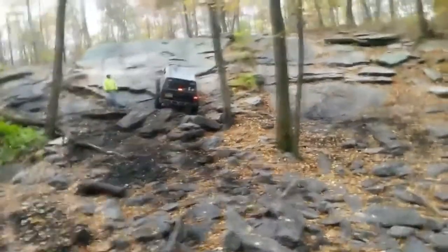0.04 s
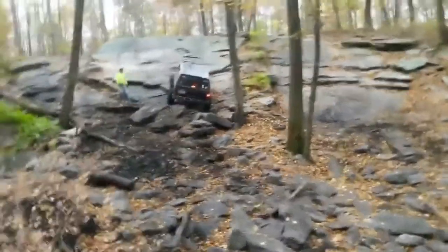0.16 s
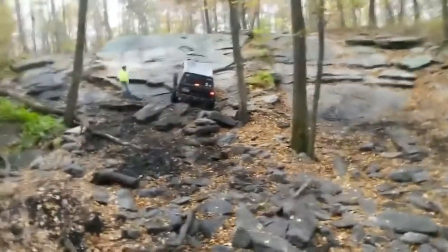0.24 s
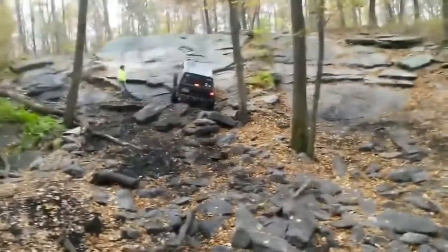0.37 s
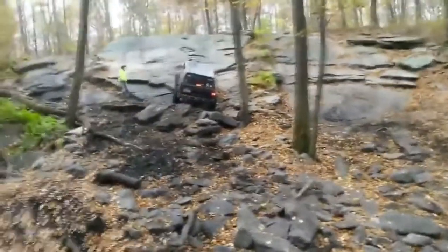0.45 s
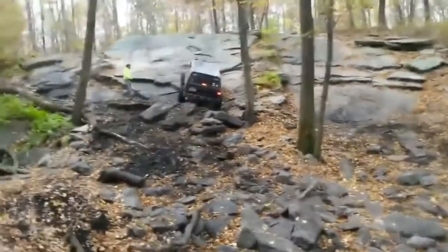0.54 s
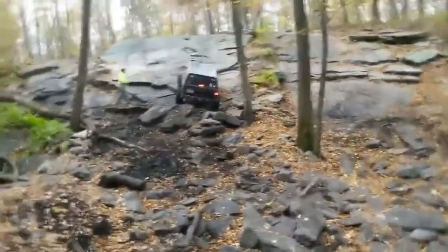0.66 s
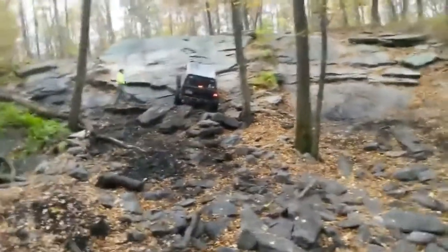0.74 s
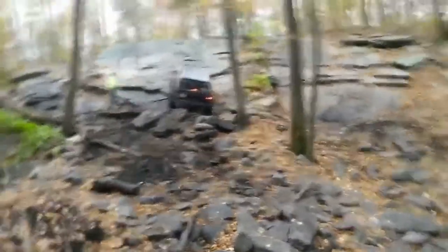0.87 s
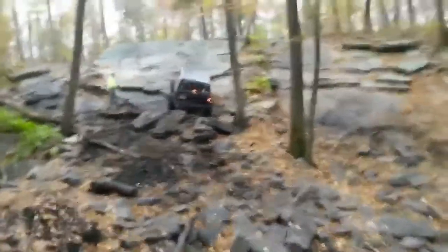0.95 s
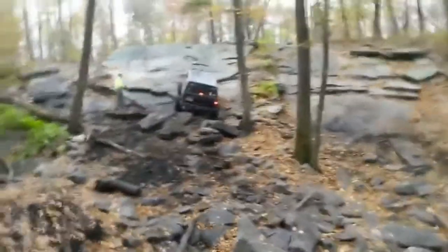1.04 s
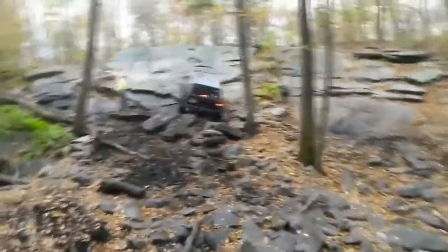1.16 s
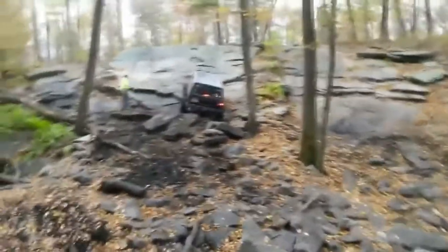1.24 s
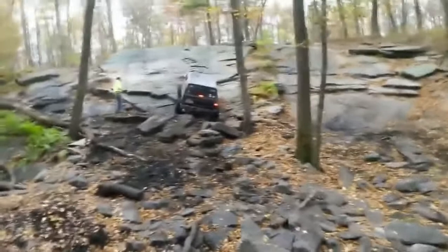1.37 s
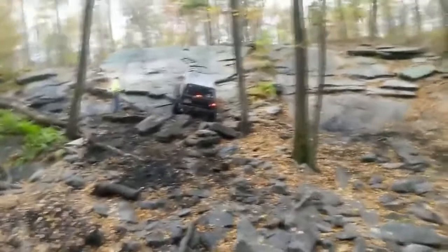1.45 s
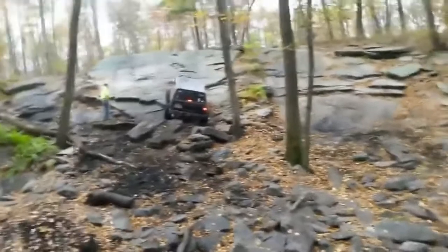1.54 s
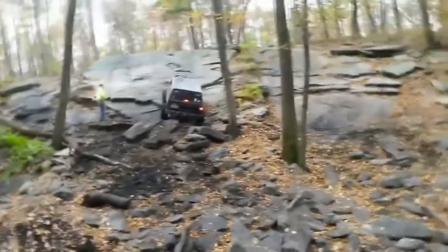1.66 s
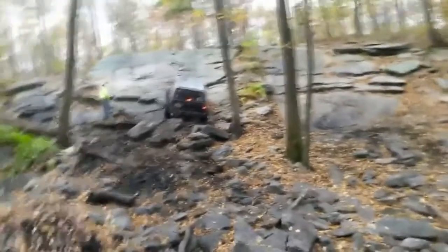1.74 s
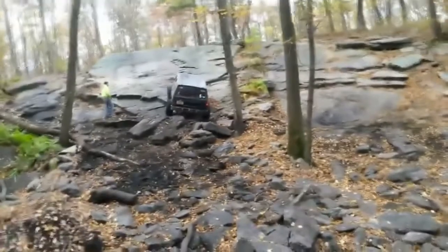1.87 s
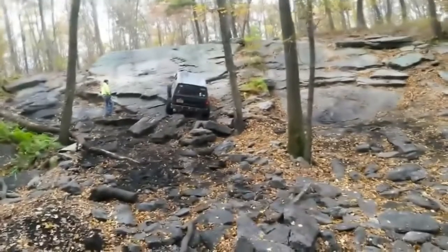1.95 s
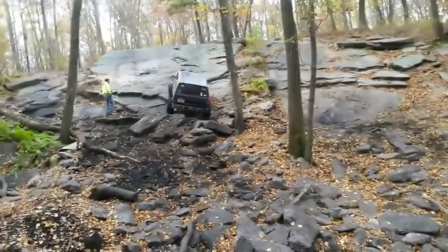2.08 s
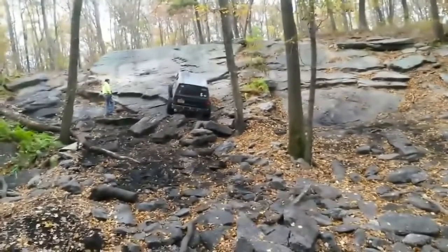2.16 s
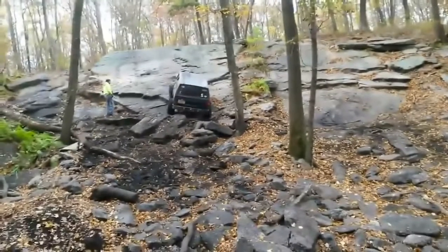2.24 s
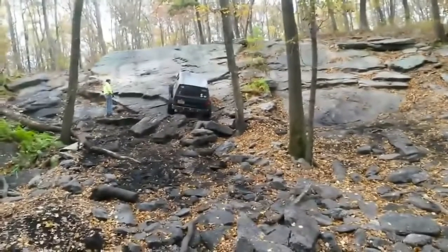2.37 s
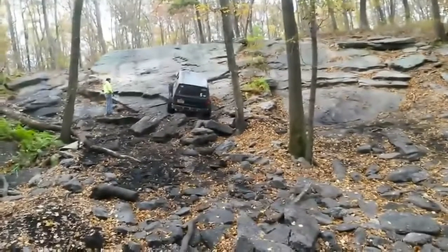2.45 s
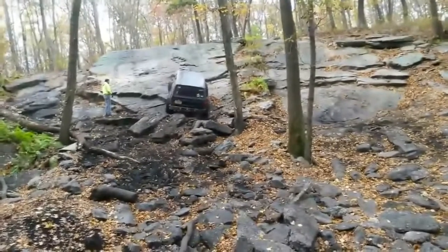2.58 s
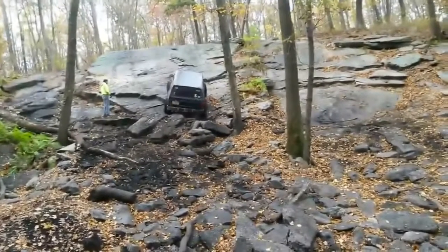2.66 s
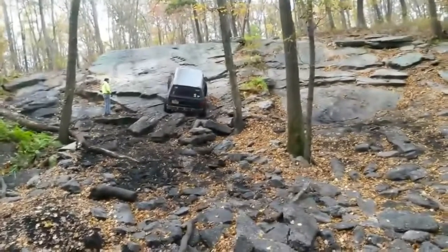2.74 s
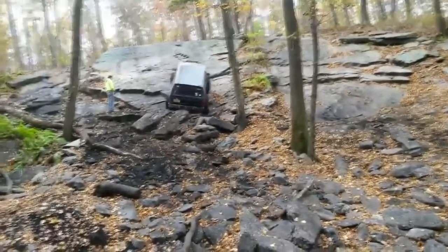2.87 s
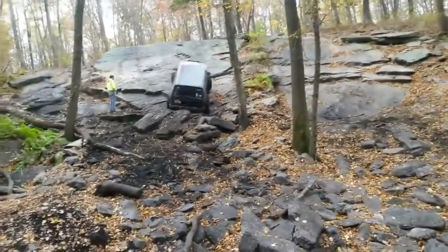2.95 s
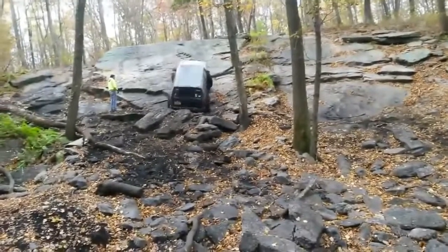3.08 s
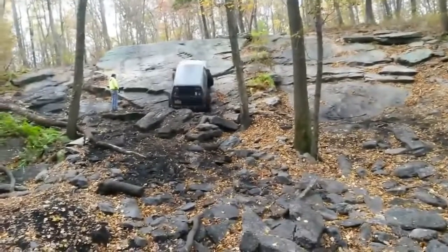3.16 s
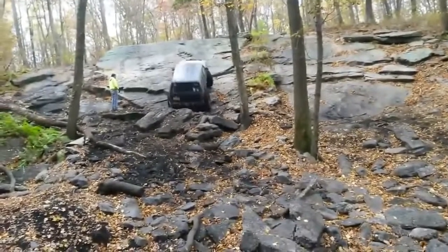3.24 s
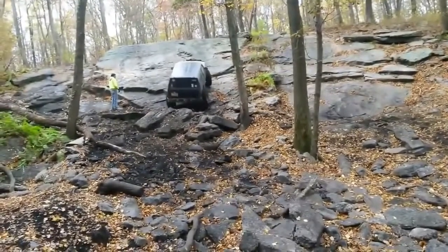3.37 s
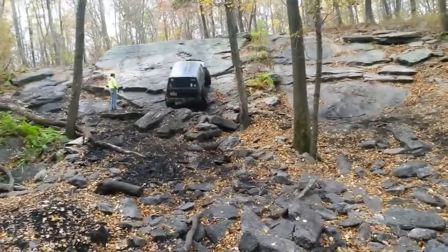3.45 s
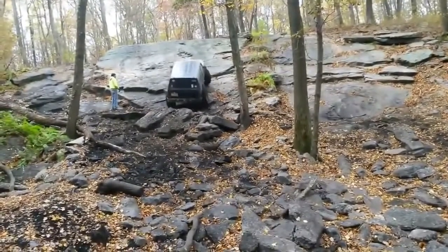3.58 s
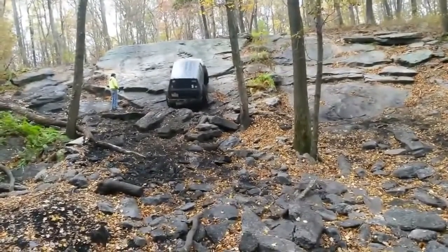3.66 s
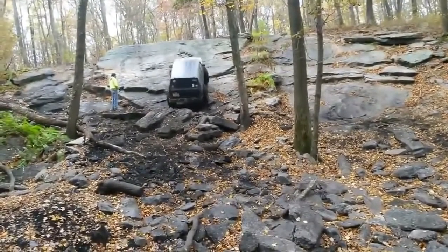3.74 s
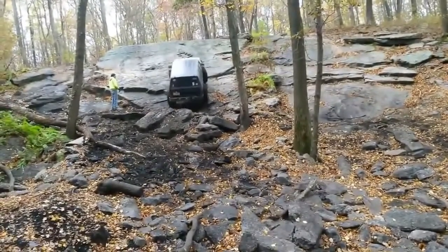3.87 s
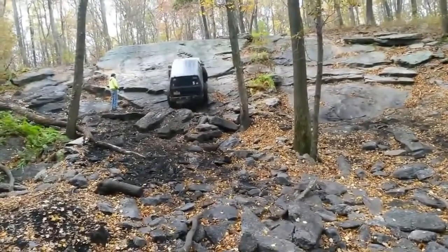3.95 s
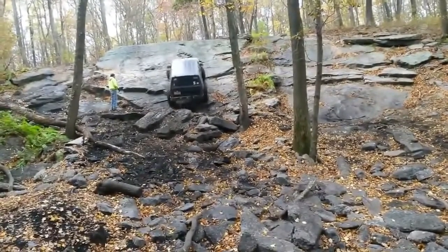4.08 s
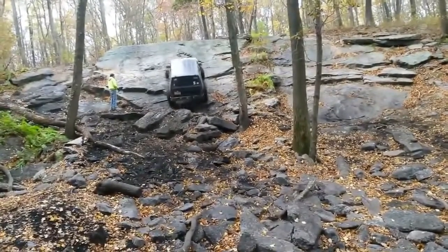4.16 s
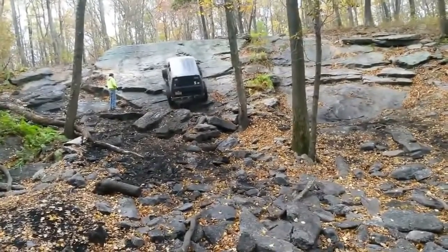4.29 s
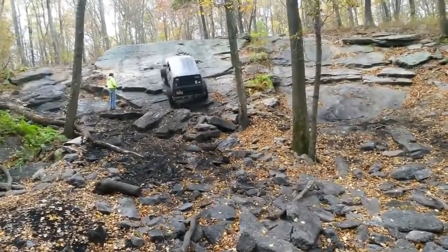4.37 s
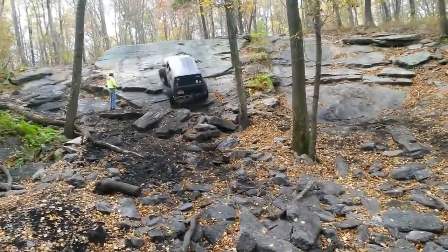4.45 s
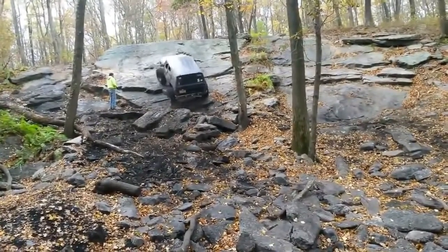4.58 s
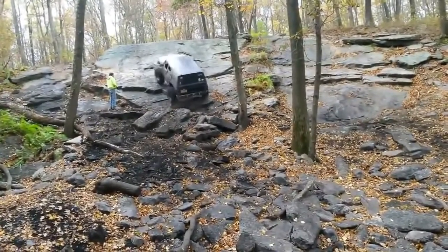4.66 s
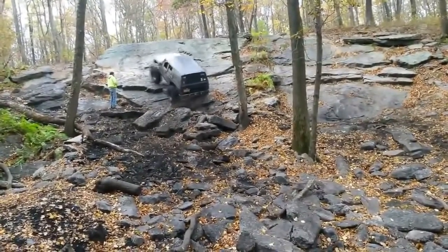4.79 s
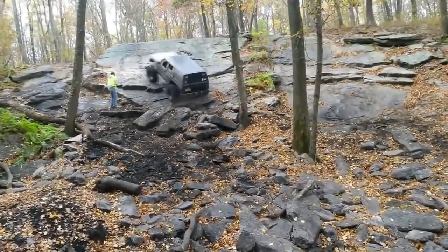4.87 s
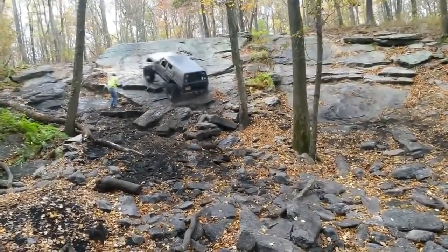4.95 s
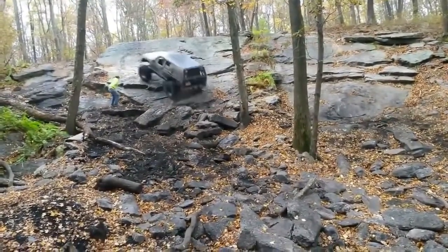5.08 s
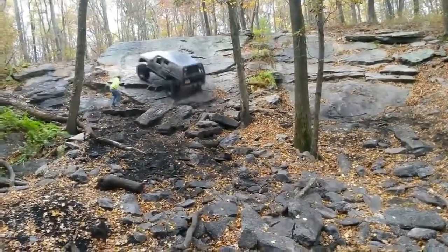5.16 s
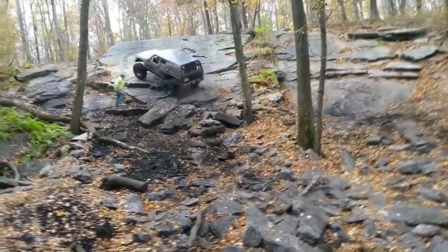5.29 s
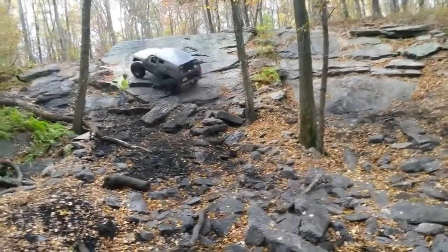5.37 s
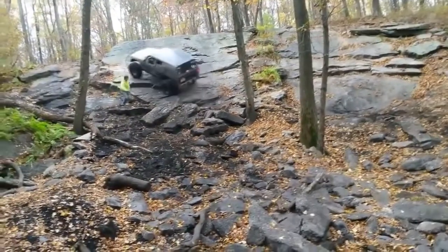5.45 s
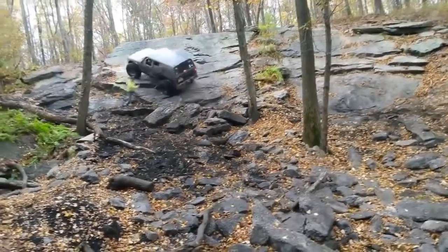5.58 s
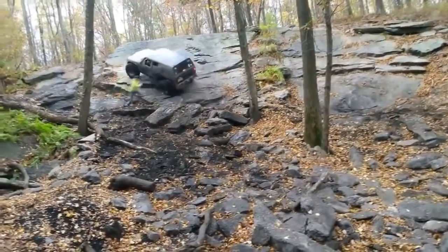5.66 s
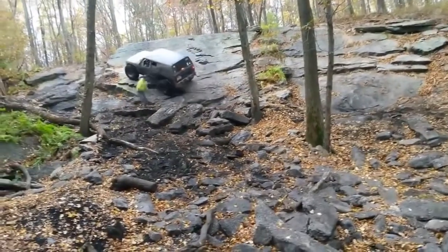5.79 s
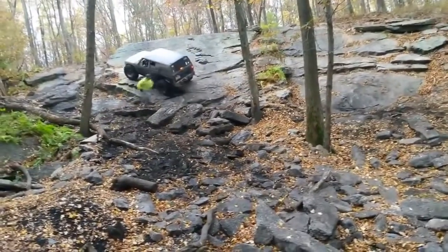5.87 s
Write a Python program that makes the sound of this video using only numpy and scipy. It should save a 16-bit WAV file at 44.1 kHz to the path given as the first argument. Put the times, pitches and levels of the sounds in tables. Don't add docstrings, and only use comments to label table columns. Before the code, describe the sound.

Outdoors, an engine idles, revs hard with a rushing hiss for about three seconds, then falls off with metal clanks; another engine rattles nearby.

```python
import sys
import numpy as np
from scipy import signal
from scipy.fft import rfft, irfft, next_fast_len
from scipy.io import wavfile
from scipy.ndimage import uniform_filter1d

SR = 44100
rng = np.random.default_rng(int(sys.argv[2]) if len(sys.argv) > 2 else 0)


def field_ratio(decibels):
    return 10 ** (np.asarray(decibels, dtype=float) / 20)


def master(y):
    cut = np.clip(np.atleast_2d(y).T, -1, 1)
    pcm = np.round(cut * 32767)
    wavfile.write(sys.argv[1], SR, pcm.astype(np.int16))


N = 261099
T = np.arange(N) / SR

FAST_HZ, SETTLED_HZ, LOAD_IN_S = 38.54, 35.68, .42
# pitch_hz, density [dB per Hz]
AIR_HISS = [(790, -33), (1350, -4.5), (1940, -1), (3080, -2), (4040, -6.5), (5550, -1), (7500, -8),
            (8050, -17), (9000, -19.5), (11700, -38), (19800, -120)]


def evened(x):
    return x / np.sqrt(np.mean(x ** 2) + 1e-20)


def read(points, hz):
    f, value = np.transpose(points)
    return np.interp(np.log(hz + 1), np.log(f + 1), value)


def columns(rows):
    s, *cols = np.transpose(rows)
    return [np.interp(T, s, c) for c in cols]


def bumps(rows):
    total = 0
    for s, half_s, *dbs in rows:
        total = total + np.array(dbs)[:, None] * np.exp(-.5 * ((T - s) / half_s) ** 2)
    return total


def colour(x, points):
    gain_db = np.maximum(read(points, abs(np.fft.fftfreq(8192, 1 / SR))), -90)
    log_gain = np.log(field_ratio(gain_db))
    phase = -signal.hilbert(log_gain).imag
    taps = np.fft.ifft(np.exp(log_gain + 1j * phase)).real[:4096]
    taps = taps.reshape((1,) * (x.ndim - 1) + (-1,))
    return signal.oaconvolve(x, taps, axes=-1)[..., :N]


def wander(rate_hz, count):
    knots = rng.standard_normal((count, 400))
    return np.array([np.interp(T * rate_hz, np.arange(400), k) for k in knots]) * 1.2


def level(x, width_s):
    return np.sqrt(abs(uniform_filter1d(x ** 2, int(width_s * SR))) + 1e-12)


def add(mix, s, sound):
    part = mix[round(s * SR):][:len(sound)]
    part += sound[:len(part)]


def ring(modes, factor, size):
    t = np.arange(size) / SR
    return sum(field_ratio(db - 60 * t / t60) * np.sin(2 * np.pi * hz * factor * t) for hz, db, t60 in modes)


def speed():
    # start_s, firing_hz
    rev_points = [(2.08, 36.84), (2.2, 45.25), (2.3, 62.8), (2.5, 95.2), (2.73, 119.2), (3.01, 147.2),
                  (3.16, 174.5), (3.35, 168), (3.56, 193.3), (3.88, 215.7), (4.1, 244.3), (4.4, 255),
                  (4.66, 257.8), (4.8, 236.7), (4.95, 220.6), (5.07, 196.7), (5.3, 159.5), (5.62, 72)]
    sag_hz, sag_s, recover_s, fall_s = 6.0, .12, .3, 0.11
    late = np.maximum(T - LOAD_IN_S, 0)
    idle = SETTLED_HZ + (FAST_HZ - SETTLED_HZ + sag_hz) * np.exp(-late / sag_s)
    idle -= sag_hz * np.exp(-late / recover_s)
    fall = np.exp(-np.maximum(T - rev_points[-1][0], 0) / fall_s)
    rev = FAST_HZ + (columns(rev_points)[0] - FAST_HZ) * fall
    return np.where(T < rev_points[0][0], idle, rev)


def tone_levels(hz, stumble_db, upper_db):
    # start_s, level_db
    pull = [(2.05, -25.5), (2.2, -9), (2.3, -5), (2.45, -10), (2.66, -5), (2.9, -8), (3.15, -12),
            (3.6, -9.5), (3.8, -7.5), (4.0, -15), (4.39, -3.5), (4.64, -14.5), (4.73, -3), (4.87, -11.5),
            (4.95, -5), (5.3, -9), (5.35, -19.5), (5.8, -27.5)]
    # pitch_hz, gain_db
    tuned_pipe = [(35, -19), (60, -6), (112, 0.5), (150, -4.5), (205, -2), (245, -11), (400, -11),
                  (800, -16)]
    # multiple of the firing rate, idle level_db, tilt [dB per doubling of speed]
    multiples = [(1, 0, 0), (2, -5.5, -1), (3, -6, -10)]
    pressure_db = columns(pull)[0] + stumble_db
    doublings = np.log2(hz / SETTLED_HZ)
    first, second, third = [pressure_db + read(tuned_pipe, k * hz) + db + tilt_db * doublings
                            for k, db, tilt_db in multiples]
    fast = np.clip((LOAD_IN_S + 0.058 - T) / 0.12, 0, 1) + np.clip((T - 5.84) / 0.048, 0, 1)
    return first, second + upper_db, third + upper_db + 12.5 * fast


def tones(turns, levels_db):
    total = 0
    for k, (db, w) in enumerate(zip(levels_db, wander(22.107, count=3))):
        total = total + np.sqrt(2) * field_ratio(db + 1.8 * w) * np.cos(2 * np.pi * (k + 1) * turns - 0.78 * k)
    return total


def cycle_lines(turns, hz, rasp_db):
    # multiple of the six-firing cycle, level_db
    weak_lines = [(1, -32), (2, 0.5), (3, -16.5), (4, -14), (5, -10.5), (6, 0), (7, -20), (8, -11),
                  (9, -15.5), (10, -10.5), (11, -37), (12, -9), (13, -22), (14, -22), (15, -18.5), (16, -7),
                  (17, -23), (18, -17), (19, -12), (20, -18), (21, -14.5), (22, -2), (23, -23.5),
                  (24, -18.5), (25, -20.5), (26, -25), (27, -15)]
    # multiple of the cycle, level_db at full speed, slope [dB per Hz below it]
    strong_lines = [(2, -24, .217), (4, -36, -.052), (8, -37, .099), (9, -37, .122), (10, -37, .043),
                    (14, -40, .07), (16, -27.5, .214), (18, -38, .101), (19, -37, .214), (20, -32, .186),
                    (22, -30.5, .19), (23, -39, .173), (25, -43, .165), (26, -42, .083), (28, -43, .106),
                    (30, -48, -.003)]
    # multiple of the cycle, centre_s, half_length_s, level_db
    swells = [(2, 4.4, 0.13, 4), (2, 5.24, 0.06, 11), (4, 3.34, 0.13, 4.5), (4, 3.74, 0.13, 8),
              (4, 5.14, 0.06, 8), (8, 3.7, 0.09, 8), (8, 4.14, 0.13, 7), (8, 5.28, 0.04, 15),
              (9, 2.92, 0.09, 19), (9, 4.28, 0.13, 10), (9, 4.8, 0.04, 8), (10, 3.24, 0.09, 11),
              (10, 3.94, 0.04, 14), (10, 4.54, 0.09, 9), (14, 3.32, 0.04, 10), (14, 4.12, 0.06, 16),
              (14, 4.86, 0.04, 11), (14, 5.14, 0.13, 13), (16, 3.34, 0.09, 9), (16, 4.22, 0.13, 7),
              (16, 4.76, 0.09, 7), (16, 5.22, 0.06, 12), (18, 2.9, 0.13, 12), (18, 3.92, 0.06, 16),
              (18, 4.8, 0.09, 11), (19, 4.38, 0.13, 11), (19, 5.22, 0.06, 16), (20, 2.92, 0.06, 17),
              (20, 4.12, 0.06, 15), (20, 4.8, 0.04, 16), (20, 5.12, 0.13, 8), (22, 4.12, 0.04, -10),
              (22, 4.58, 0.13, 8), (22, 4.88, 0.04, 6), (22, 5.22, 0.09, 12), (23, 4.16, 0.13, 9),
              (23, 4.9, 0.04, 16), (23, 5.24, 0.06, 18), (25, 4.46, 0.04, 14), (25, 4.8, 0.13, 7),
              (25, 5.24, 0.13, 9), (26, 3.86, 0.13, 10), (26, 4.98, 0.13, 12), (28, 3.76, 0.06, 11),
              (28, 4.32, 0.09, 9), (28, 5.1, 0.13, 11), (30, 3.28, 0.09, 10), (30, 3.88, 0.13, 7),
              (30, 5.2, 0.09, 15)]
    full_hz = 256
    elsewhere = (6, 12, *[row[0] for row in strong_lines])
    weak = 0
    for (k, db), w in zip(weak_lines, wander(7, count=len(weak_lines))):
        if k not in elsewhere:
            weak = weak + field_ratio(db + 5.2 * w) * np.cos(2 * np.pi * k * (turns / 6 + 0.016 * w))
    strong = 0
    for (k, db, slope), w in zip(strong_lines, wander(23.92, count=len(strong_lines))):
        swell_db = bumps([row[1:] for row in swells if row[0] == k])[0]
        line_db = db + slope * (hz - full_hz) + swell_db + 1.5 * w
        strong = strong + np.sqrt(2) * field_ratio(line_db) * np.cos(2 * np.pi * k * turns / 6 + k * k)
    loaded = np.interp(T, [2.6, 2.9, 5.25, 5.4], [0, 1, 1, 0])
    return field_ratio(rasp_db - 11.0) * evened(weak) + loaded * strong


def chuffs(turns, chuff_db):
    # pitch_hz, density [dB per Hz]
    pipe_body = [(15, -21), (25, -15), (59, -12.5), (140, 2.5), (163, -8.5), (220, -7.5), (255, -15),
                 (335, -10), (425, -22.5), (502, -16), (583, -30.5), (730, -25.5), (900, -45), (1170, -45),
                 (1980, -120)]
    fired = np.diff(np.floor(turns), prepend=0) > 0
    cylinder = np.array([0.88, 0.15, -1.3, -1.1, 0.98, -1.43])[turns.astype(int) % 6]
    push = fired * (0.73 * cylinder + np.clip(rng.standard_normal((2, N)), -2, 2))
    lump = colour(push + 0.066 * rng.standard_normal((2, N)), pipe_body)
    return field_ratio(chuff_db) * lump / level(lump, 0.23)


def cracks():
    # start_s, peak level_db
    snaps = [(2.131, -40), (2.154, -27.5), (2.178, -24.5), (2.201, -31), (2.221, -21.5), (2.241, -30),
             (2.261, -31), (2.279, -31), (2.296, -40), (2.308, -26.5), (2.337, -24), (2.353, -25),
             (2.366, -26), (2.383, -32), (2.405, -29), (2.43, -29), (2.466, -28), (2.498, -29),
             (2.537, -28)]
    # pitch_hz, level_db, t60_s
    tailpipe = [(810, 8, 0.043), (1150, -16, 0.018), (1940, -4, 0.03), (2226, -3, 0.051), (2690, -7, 0.069)]
    out = np.zeros(N)
    puffs = evened(colour(rng.standard_normal(N), [(300, -9), (800, 0), (2500, 8), (6000, -27)]))
    for s, db in snaps:
        add(out, s, field_ratio(db - 6.0) * ring(tailpipe, 1, size=2000))
        puff = puffs[round(s * SR):][:800] * field_ratio(-60 * T[:800] / 0.018)
        add(out, s, field_ratio(db - 3.0) * puff)
    return out


def puffed(turns, points, depth, patchy_db, grit):
    strength = field_ratio(2.0 * rng.standard_normal(2000))[turns.astype(int)]
    gate = 1 + depth * strength * np.exp(-(turns % 1) / 0.5)
    specks = depth * grit * np.minimum(rng.exponential(1, N), 3) * (rng.random(N) < 150 / SR)
    noise = colour(gate * rng.standard_normal((2, N)) + specks, points)
    return noise / level(noise, 0.063) * field_ratio(patchy_db * wander(30, count=1))


def follow(flow_db, idle_db, middle_db, slope):
    return 10 * np.log10(field_ratio(2 * idle_db) + field_ratio(2 * (middle_db + slope * (flow_db + 28))))


def rushing_air(turns, hz):
    # start_s, hiss level_db
    flow_points = [(2.12, -48), (2.17, -37), (2.42, -28), (2.65, -27), (2.77, -31), (2.98, -32.5),
                   (3.28, -29.5), (3.68, -26), (4.14, -20.5), (4.65, -20), (4.73, -21.5), (4.86, -20),
                   (5.0, -23), (5.16, -25), (5.26, -22.5), (5.49, -38.5), (5.92, -42.5)]
    # centre_s, half_length_s, rasp_db, hiss_db, fizz_db
    jolts = [
        (1.65, 0.087, 3, 1.5, 2),
        (2.23, 0.047, 11.5, -0.5, 4),
        (2.705, 0.028, -10, -6, -4),
        (3.36, 0.032, 1, 2.5, 9),
        (5.19, .03, 4.5, 0.5, 0),
        (5.61, 0.017, 10, 1, 1),
        (5.72, 0.031, 3, -4, -7),
        (5.8, 0.026, 7, 4, 0),
    ]
    # idle level_db, level_db at middle flow, slope [dB per dB of flow]
    rasp_law = (-42, -25.5, 1.4)
    fizz_law = (-54.5, -45, 1.3)
    # pitch_hz, density [dB per Hz]
    rasp = [(150, -29.5), (250, -4.5), (291, -7), (360, -5), (419, -5), (468, -5.5), (560, -7.5), (670, -6),
            (738, -13), (819, -6.5), (1300, -15.5), (1690, -62), (2860, -120)]
    fizz = [(4410, -39), (7500, 3.5), (8040, -1), (9670, -2), (12300, 1.5), (13300, -1.5), (14500, -22)]
    shield = [(500, -25), (830, 8.5), (1250, -21), (1900, -10), (2400, 0.5), (3200, -27)]
    whistle = [(4000, -30), (5000, -6), (6300, 0), (7500, -1), (7950, -30)]
    flow_db = columns(flow_points)[0]
    follow_db = [follow(flow_db, *rasp_law), flow_db, follow(flow_db, *fizz_law)]
    rasp_db, hiss_db, fizz_db = bumps(jolts) + follow_db
    load = np.clip((hiss_db + 55.5) / 14, .1, 1)
    sharp = load * (1 + 2.1 * np.clip((100 - hz) / 50, 0, 1))
    air = field_ratio(rasp_db - 5.5) * puffed(turns, rasp, sharp * 0.93, patchy_db=1.34, grit=0.95)
    air += field_ratio(hiss_db) * puffed(turns, AIR_HISS, sharp * 0.24, patchy_db=0.72, grit=4.7)
    air += field_ratio(fizz_db) * puffed(turns, fizz, load * 0.34, patchy_db=0.7, grit=6.0)
    buzz_db = hiss_db - 5.5 - np.clip(hz - 110, 0, 200) / 12
    air += load * field_ratio(buzz_db) * puffed(turns, shield, 1.3, patchy_db=3.0, grit=0.55)
    opening = np.interp(T, [2.2, 2.35, 2.8, 3.1], [0, 1, 1, 0])
    air += opening * field_ratio(hiss_db - 10.0) * puffed(turns, whistle, .3, patchy_db=1.5, grit=1.5)
    return air, rasp_db


def knocks():
    # pitch_hz, level_db, t60_s
    metal = [(1205, -6.5, 0.17), (2186, -13, .08), (3671, -14, .06), (5130, -14, 0.03), (8366, -22, 0.073)]
    # start_s, peak level_db, loudest mode pitch_hz, share of rattle [0-1]
    clanks = [
        (5.517, -28, 1199, 0.5),
        (5.587, -18, 2340, 0.4),
        (5.622, -18, 3030, 0.4),
        (5.741, -15, 3320, 0.4),
        (5.7496, -23, 3165, 0.24),
        (5.785, -25, 2336, 0.5),
        (5.827, -21, 2030, 0.4),
    ]
    # start_s, length_s, pitch_hz, level_db
    squeaks = [
        (5.774, .05, 4580, -45),
        (5.822, 0.07, 4560, -36.5),
        (5.75, 0.06, 1211, -45),
        (5.845, 0.05, 3690, -41),
        (5.765, .07, 3690, -49),
        (5.59, .065, 1190, -43),
    ]
    out, t = np.zeros(N), T[:4000]
    rattles = colour(rng.standard_normal(N), AIR_HISS)
    for s, db, loudest_hz, share in clanks:
        share = np.clip(share, 0, 1)
        tail = evened(rattles[round(s * SR):][:4000]) * field_ratio(-60 * t / 0.077)
        modes = [(hz, mode_db - 6.0, t60 * 0.77) for hz, mode_db, t60 in metal]
        modes += [(loudest_hz, -3.5, .035)]
        shake = rng.standard_normal(900) * field_ratio(-60 * t[:900] / 0.03) / 9
        rung = signal.fftconvolve(shake, ring(modes, 1, size=6000))
        add(out, s, field_ratio(db + 0.5) * (1 - share) * rung)
        add(out, s, field_ratio(db - 7.5) * share * tail)
    for s, length, hz, db in squeaks:
        u = np.arange(int(length * SR)) / SR
        swell = np.sin(np.pi * (u / length) ** 0.4)
        stutter = field_ratio(1.8 * evened(uniform_filter1d(rng.standard_normal(len(u)), 200)))
        glide = np.sin(2 * np.pi * hz * u * (1 - 0.027 * u))
        add(out, s, field_ratio(db) * swell * stutter * glide)
    return out


def pebble():
    # start_s, peak level_db, pitch_hz
    stone = [
        (2.7079, -12, 5500),
    ]
    out = np.zeros(N)
    for s, db, hz in stone:
        add(out, s, field_ratio(db + 17.5) * np.array([1., -.3]))
        add(out, s + .0001, field_ratio(db - 1.5) * ring([(hz, 0.5, .0035)], 0.99, size=600))
    return colour(out, [(400, -22), (1500, -3.0), (3500, 5), (5500, 5), (7000, -4), (9000, -14),
                        (11500, -8), (15000, -19)])


def nearby_engine():
    # pitch_hz, level_db, t60_s
    valve_modes = [(4570, -4, .06), (5490, -3, .05), (6370, -1, .06), (7270, -3, .06), (8300, -4, .05),
                   (9400, 0, .07), (10420, -3, .06), (10640, -3, .06), (11160, -1, .06), (11600, 1, .06),
                   (12050, 0, .05), (13120, -6, .05)]
    # multiple of the engine cycle, level_db
    low_tones = [(3, -74), (6, -38), (12, -28.5), (18, -37.5)]
    cycle_hz, start_s = 11.76, 0.01009
    cycles = (T - start_s) * cycle_hz + 1
    strength = field_ratio(1.5 * rng.standard_normal(100))[cycles.astype(int)]
    rattle = (.35 + np.exp(-(cycles % 1) / .45)) * strength
    shaken = uniform_filter1d(rattle, 300) * rng.standard_normal((2, N))
    rung = signal.oaconvolve(shaken, ring(valve_modes, 1., size=4000)[None], axes=1)[:, :N]
    rasped = colour(shaken, [(900, -43), (1350, 11.5), (4200, -30), (6000, -1.0), (9000, -6),
                             (12000, 4), (14700, -3.0)])
    hum = 0
    for (k, db), w in zip(low_tones, wander(9.6, count=4)):
        hum = hum + field_ratio(db + 0.58 * w) * np.cos(2 * np.pi * (k * cycles + 0.083 * w))
    return field_ratio(-54.5) * evened(rung) + field_ratio(-51) * evened(rasped) + hum


def trees(x):
    sparse = rng.choice([-1., 1.], 6000) * (rng.random(6000) < .05)
    taps = sparse * field_ratio(-60 * np.arange(6000) / SR / 0.14)
    return signal.oaconvolve(x, taps / np.linalg.norm(taps))[:N]


def port_pair(pair):
    # pitch_hz, likeness [-1 to 1]
    likeness = [(30, .98), (300, .98), (600, .95), (1000, .88), (1200, .2), (2000, .5), (3300, .45),
                (5500, .2), (9000, .15), (15000, 0)]
    # pitch_hz, level_db
    lean_points = [(60, 2), (92, -3), (140, -1.5), (210, -3.5), (330, -3.5), (500, -5), (770, 2),
                   (1170, 2.0), (1790, 0.5), (2740, 0.5), (4180, 5.5), (6390, 8), (9770, -18.5),
                   (14900, -17.5)]
    # pitch_hz, phase [radians]
    lead = [(30, .1), (130, .2), (300, .12), (600, 0), (1000, -.2), (3000, -1.0)]
    size = next_fast_len(N + 4096)
    shared, extra = rfft(pair, size, axis=1)
    f = np.fft.rfftfreq(size, 1 / SR)
    same = np.clip(read(likeness, f), -1, 1)
    lean = field_ratio(read(lean_points, f) / 2)
    both = np.sqrt(lean ** 2 + lean ** -2 + 2 * same) / 2
    right = same * shared * np.exp(-1j * read(lead, f)) + np.sqrt(1 - same ** 2) * extra
    return irfft(np.array([shared * lean, right / lean]) / both, size, axis=1)[:, :N]


def scene():
    # centre_s, half_length_s, chuff_db, tone_db, upper multiples level_db
    stumbles = [(2.18, 0.025, 3, -3.5, 7.5), (5.15, 0.076, -3, 0, -7.5), (4.24, 0.13, 0, -0.5, 4),
                (4.66, 0.042, 2, -0.5, 10), (2.506, 0.14, 3, -0.5, -2.5), (2.36, .07, 0, -1, 3),
                (2.70, 0.015, 6.5, -5.5, -15), (2.7, 0.037, 1, 0.5, -0.5), (3.27, 0.079, 3, -1, -1),
                (3.6, 0.055, 0, -2.5, 5), (3.78, 0.044, -2, -0.5, -18), (4.05, .12, 1.5, 0.5, 7),
                (4.47, 0.041, 2, -2, -16), (4.87, 0.027, 9, 0, 4), (4.97, 0.049, -2, 2.5, -10),
                (5.33, 0.093, 11, 0.5, 3), (5.48, 0.045, 4, -3, 6), (5.25, 0.017, 1, -3, 3),
                (5.71, .03, 0, -1, 4), (5.67, 0.051, -1.5, -3.5, 7)]
    hz = speed()
    turns = np.cumsum(hz) / SR + .3
    rough_db, stumble_db, upper_db = bumps(stumbles)
    chuff_db = np.interp(T, [2.2, 2.3], [-25, -27]) + rough_db
    air, rasp_db = rushing_air(turns, hz)
    solid = tones(turns, tone_levels(hz, stumble_db, upper_db))
    solid = solid + cycle_lines(turns, hz, rasp_db) + knocks()
    pair = np.array([solid, trees(solid)])
    pair += chuffs(turns, chuff_db) + cracks() + air + pebble() + nearby_engine()
    return port_pair(pair)


def thin_top(x):
    top_from_hz, top_keep_db, chance_db = 12900, -46.5, 2.5
    hz, _, z = signal.stft(x, SR, nperseg=1024)
    power = uniform_filter1d((abs(z) ** 2).sum(0), 3, axis=1)[:512]
    bands_db = 10 * np.log10(power.reshape(64, 8, -1).sum(1) + 1e-20)
    whole_db = 10 * np.log10(power.sum(0) + 1e-20)
    chance = evened(uniform_filter1d(rng.standard_normal(bands_db.shape), 5, axis=1))
    limit_db = whole_db + top_keep_db + .45 * (whole_db - whole_db.max()) + chance_db * chance
    band_of_bin = np.minimum(np.arange(513) // 8, 63)
    keep = (bands_db > limit_db)[band_of_bin] | (hz[:, None] < top_from_hz)
    patches = uniform_filter1d(rng.standard_normal(keep.shape), size=2, axis=0)
    patches = evened(uniform_filter1d(patches, size=6, axis=1))
    keep = keep * field_ratio(2.1 * patches * (hz[:, None] > 1000))
    return signal.istft(z * keep, SR, nperseg=1024)[1][:, :N]


def low_pass(x):
    return signal.sosfilt(signal.butter(12, 15540, fs=SR, output="sos"), x)


def record(dry):
    high_pass = signal.butter(2, 32, "high", fs=SR, output="sos")
    rumble_cut = signal.sosfilt(high_pass, dry)
    overloaded = np.tanh(-rumble_cut * 0.66) / 0.75
    edge = signal.firwin(401, 14700, window=("kaiser", 7), fs=SR)
    limited = signal.oaconvolve(overloaded, edge[None], "same")
    return low_pass(thin_top(limited))


dry = scene()
out = record(dry)
master(out)
```